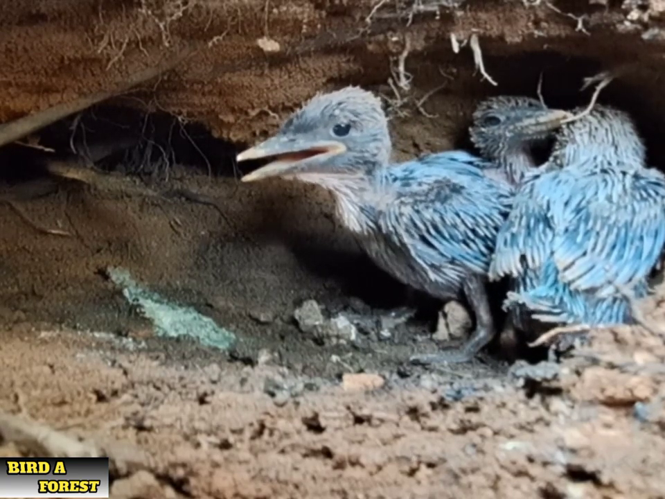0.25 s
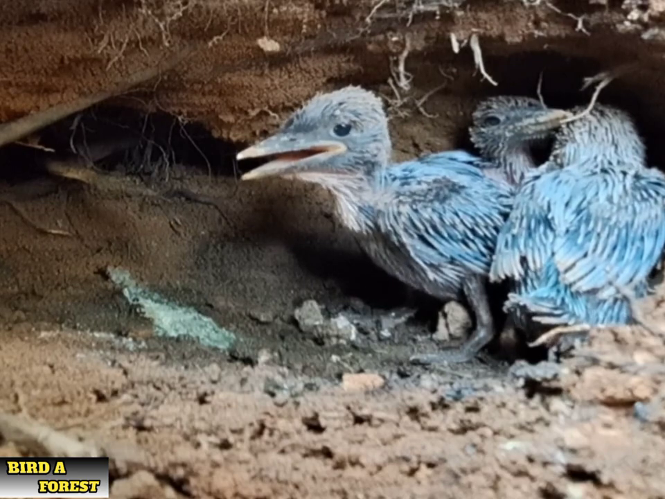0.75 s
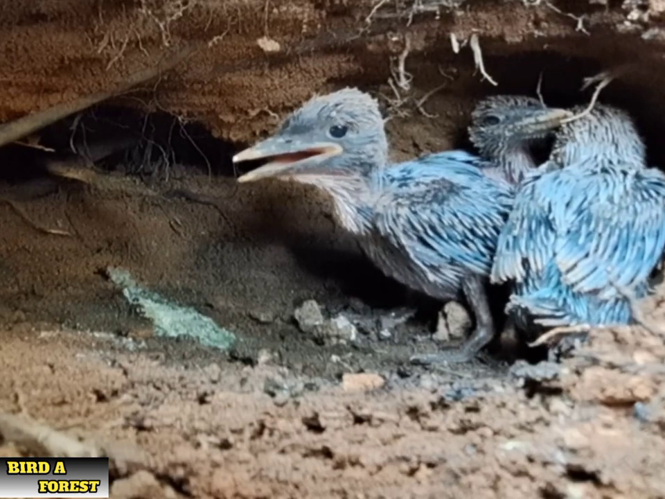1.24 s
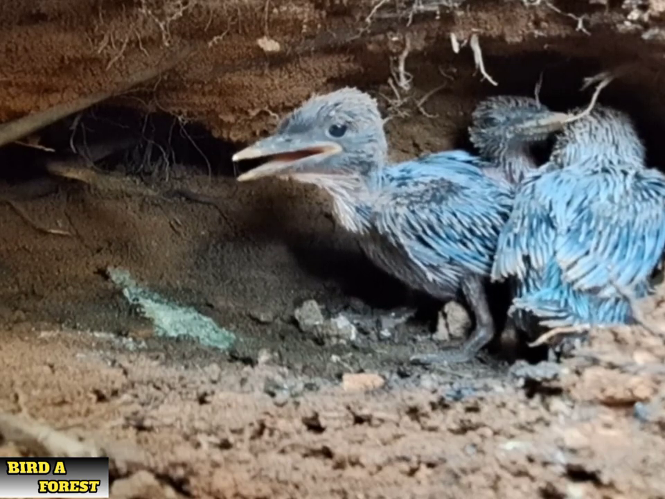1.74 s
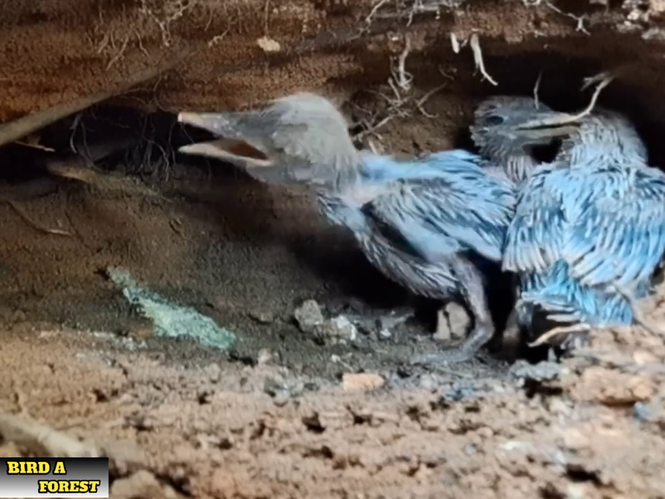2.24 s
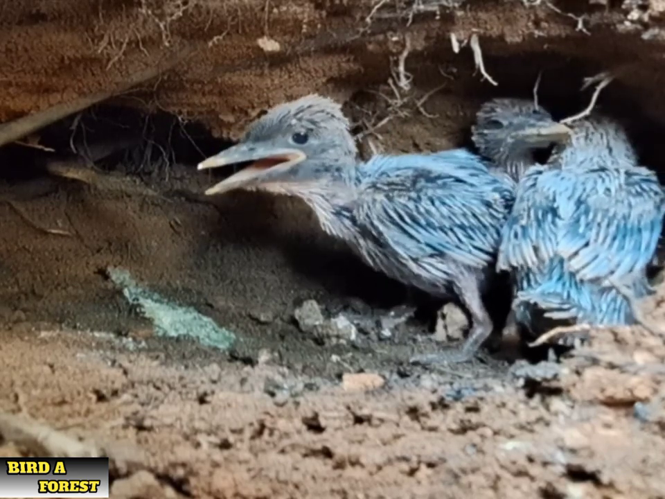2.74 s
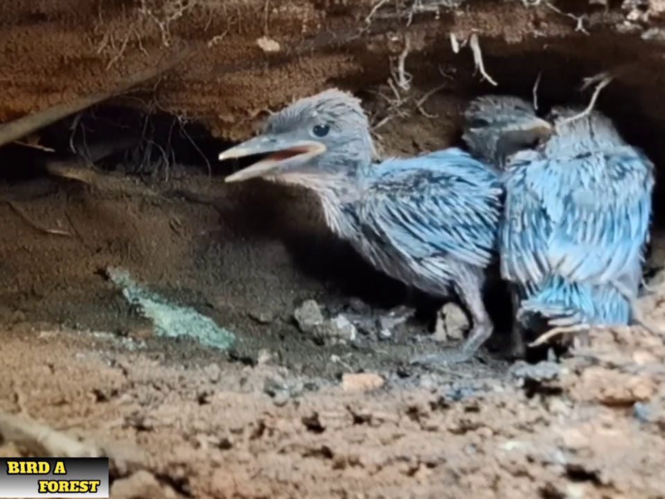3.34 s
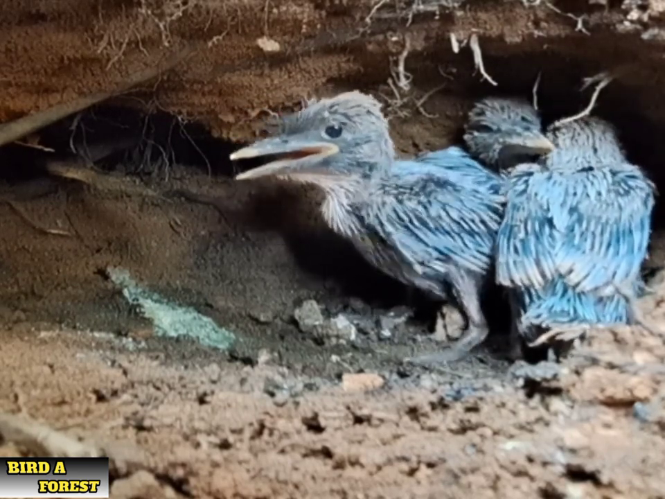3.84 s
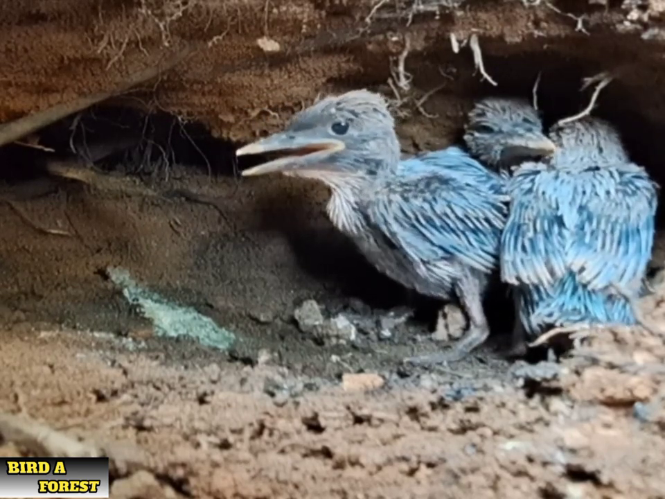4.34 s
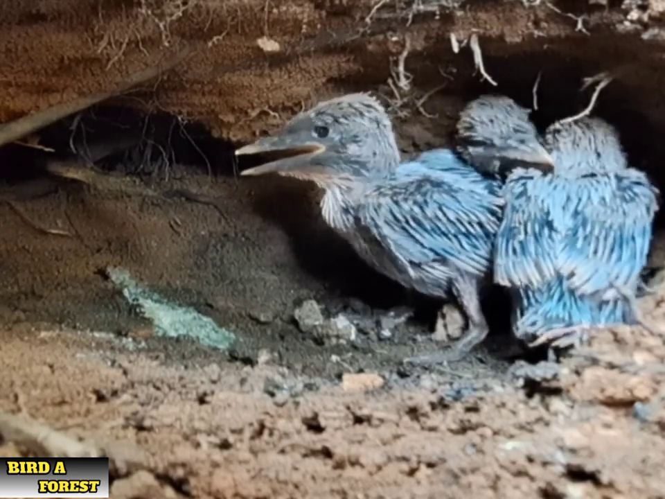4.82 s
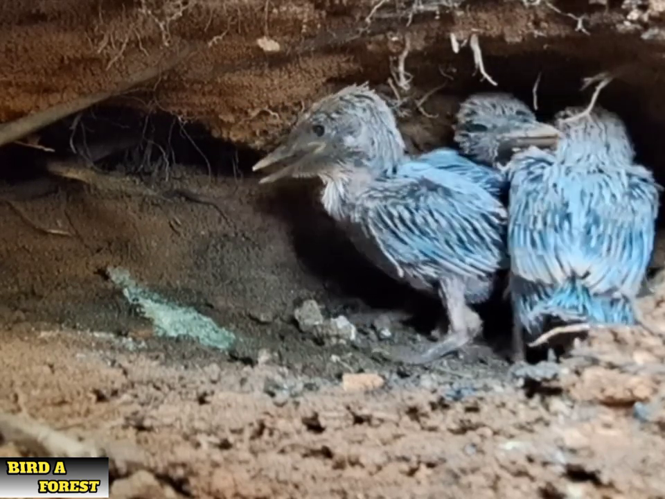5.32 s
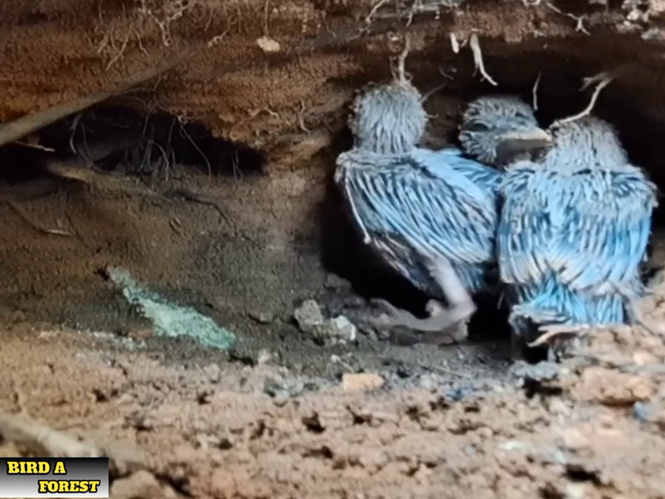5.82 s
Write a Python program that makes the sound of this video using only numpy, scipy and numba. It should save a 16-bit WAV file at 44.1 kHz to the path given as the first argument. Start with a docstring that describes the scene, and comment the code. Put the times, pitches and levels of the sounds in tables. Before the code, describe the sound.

In a small earthen burrow, a young bird begs very close to the left microphone, rattling out short, raspy churrs about nine per second. Many open with a tiny click or end in a squeak. After a hollow swallow come two long harsh cries, then more quick churrs, longer rasps, small swallows and a final loud churr. Low air stirs throughout; the right side is much fainter, slightly late and echoing.

```python
"""A nestling, rather like a young kingfisher, begs in an earthen burrow, close to the left of two microphone ports.
From the start it churrs in quick rows, its syrinx flapping chaotically into throat, windpipe, chest and beak;
many churrs open with a click or end on a clean squeak. Near 1.7 s a swallow rings a hollow, then two long cries
follow. More churrs, longer calls and two swallows come before a last loud churr at 6 s. Throughout, air stirs on
both ports, and the right port hears the bird late, with its tone changed and full of echoes from the earth walls."""
import sys
import numpy as np
from scipy import signal
from scipy.fft import rfft, irfft, next_fast_len
from scipy.io import wavfile
from scipy.ndimage import uniform_filter1d, minimum_filter1d, map_coordinates
from numba import njit

SR = 44100
rng = np.random.default_rng(int(sys.argv[2]) if len(sys.argv) > 2 else 0)


def ratio_of_db(decibels):
    """Turn decibels (scalar or array-like) into linear amplitude factors; 0 dB maps to 1."""
    return 10 ** (np.asarray(decibels, float) / 20)


def dump_mix(stems):
    """Bounce the given channels to the path in sys.argv[1] as a 16-bit WAV at rate SR."""
    frames = np.atleast_2d(stems).T  # one column per channel
    limited = np.clip(frames, -1, 1)  # hard clip at full scale
    pcm = np.round(limited * 32767).astype(np.int16)
    wavfile.write(sys.argv[1], SR, pcm)


N = 267687
T = np.arange(N) / SR  # time of every sample in seconds

# Air on the ports. Each row: time in seconds, level in dB before each port's own offset.
AIR_LEVEL = [(0, -45), (1.3, -41.5), (2.1, -48.5), (3, -52), (3.599, -47), (4.6, -48.5), (5.502, -46),
             (5.7, -40), (6.07, -48.5)]
# Tone of the stirring air. Each row: frequency in Hz, gain in dB; only the shape counts.
AIR_COLOUR = [(20, -14), (50, -0.5), (150, 1.5), (250, -8), (400, -19), (800, -19.5), (2000, -36)]
# Tone of the faint outdoor hiss. Each row: frequency in Hz, gain in dB; only the shape counts.
HISS_COLOUR = [(1500, 1), (3300, -1), (5400, 8.5), (7500, -28), (12000, -54), (15500, -48)]
# Earth walls toward the right port. Each row: frequency in Hz, gain in dB.
WALL_COLOUR = [(300, 13), (700, -7), (1300, 2), (2300, 7.5), (3000, -1), (3700, -2), (4500, 2.5),
               (6200, 8.5), (8500, 1), (15000, -3)]
# Swallows. Each row: time in seconds, frequency in Hz, width in Hz, level in dB.
GULPS = [(1.684, 820, 150, -19), (4.407, 800, 170, -25), (5.563, 900, 110, -28)]
# Churrs and long cries. Each row: start in seconds, length in seconds, full level in dB, opening click
# in dB (-40 or below means a soft opening).
CHURRS = [(-0.04, 0.068, -6.5, -60), (0.068, 0.05, -7, -16), (0.182, 0.052, -7.5, -19.5),
          (0.292, 0.059, -8, -18.5), (0.405, 0.06, -9, -19), (0.512, 0.066, -8.5, -13),
          (0.621, 0.057, -8.5, -22), (0.738, .05, -10, -60), (0.847, .068, -8, -60),
          (0.968, 0.062, -8, -60), (1.077, 0.062, -9, -20), (1.189, 0.058, -10.5, -21),
          (1.29, 0.055, -7, -15.5), (1.399, .054, -8, -60), (1.508, 0.067, -9.5, -18),
          (1.62, 0.078, -10, -19.5), (1.718, 0.38, -10, -24), (2.154, 0.35, -8.5, 2),
          (2.557, 0.053, -7, -60), (2.609, 0.13, -11.5, -60), (2.69, 0.077, -7, -60),
          (2.819, 0.053, -10, -17.5), (2.919, 0.05, -10.5, -14.5), (3.024, 0.055, -11, -18),
          (3.098, 0.077, -11.5, -60), (3.195, 0.052, -11, -60), (3.303, .055, -9.5, -16),
          (3.406, 0.053, -10.5, -15), (3.492, 0.048, -10.5, -60), (3.589, 0.059, -10, -18),
          (3.657, 0.12, -10.5, -60), (3.729, 0.077, -7.5, -60), (3.86, 0.056, -7.5, -16.5),
          (3.964, 0.055, -7, -16), (4.057, 0.061, -8.5, -17), (4.152, 0.048, -7, -13.5),
          (4.258, 0.059, -9, -16.5), (4.344, 0.057, -9.4, -29), (4.445, 0.05, -9.5, -17.5),
          (4.554, 0.052, -8.2, -15), (4.659, .057, -8.5, -13), (4.748, 0.052, -6, -22),
          (4.835, 0.043, -7.5, -20), (4.909, 0.11, -10, -18), (4.966, 0.18, -9, -60),
          (5.21, 0.065, -8, -17.5), (5.281, .07, -6, -22), (5.389, 0.057, -8, -19),
          (5.495, 0.061, -10.5, -20), (5.577, 0.087, -9.5, -21), (5.637, 0.116, -8.5, -60),
          (5.706, 0.23, -8, -58), (6.004, 0.064, -2, -60)]
# Squeaks, where the syrinx runs evenly as it closes. Each row: start in seconds, level in dB, middle pitch in Hz.
SQUEAKS = [(0.027, -12.5, 1490), (0.123, -12.5, 1516), (0.467, -28, 1504), (0.685, -25.5, 1490),
           (0.793, -10, 1400), (1.133, -9, 1667), (1.24, -12.5, 1780), (1.344, -15, 1328),
           (1.455, -10, 1478), (2.77, -31, 1390), (3.171, -12, 1563), (3.361, -19.5, 1350),
           (3.461, -16, 1460), (3.791, -17, 1742), (4.201, -12.5, 1723), (4.311, -14.5, 1790),
           (4.402, -11.5, 1787), (4.611, -15.5, 1520), (4.798, -11.5, 1840), (4.879, -10.5, 1782),
           (5.147, -10.5, 1650), (5.551, -8, 1650)]
# Head and throat posture. Each row: time in seconds, first and second throat resonance in Hz, second and
# third resonance against the first in dB, level of the beak band in dB, of the highest treble in dB,
# and of the right port in dB.
POSTURE = [(0, 2216, 2873, 9, 6, -23.5, -23.5, -22), (1.68, 2254, 2930, 6.5, 1.5, -28, -23.5, -22),
           (1.76, 2200, 2760, 1.5, -6, -29.5, -28, -21.5), (1.81, 2590, 3040, 8, -8, -13, -28, -20),
           (1.93, 2630, 3070, 1, -4, -8.5, -22, -21.5), (2.01, 2580, 3150, 2.5, -15, -11.5, -21, -20),
           (2.078, 2200, 2820, 0, -5, -17.5, -17.5, -21), (2.17, 2704, 3220, 1.5, -4.5, -11.5, -23, -28),
           (2.3, 2747, 3160, -4.5, -7.5, -6.5, -16.5, -24), (2.5, 2610, 3110, 4.5, -9.5, -13.5, -29, -22.5),
           (3.0, 2470, 2984, 1, -4, -17.5, -38, -21.5), (3.5, 2335, 2920, 4, -0.5, -21.5, -27, -23.5),
           (3.899, 2553, 3170, 1.5, 3.5, -22.5, -31, -24), (4.3, 2525, 3050, 0, 3.5, -30.5, -24.5, -25),
           (5.05, 2640, 3180, -4.5, 1.5, -37, -21, -24), (5.35, 2680, 3070, -6.5, 0.5, -37, -21, -27),
           (5.5, 2440, 3130, 4, 9.5, -41, -18, -18.5), (5.6, 2414, 3070, -8, -2.5, -43, -23, -18),
           (5.7, 2420, 2900, -1, -11, -32, -36, -19), (5.78, 2578, 2980, -4, -9, -34, -33, -20),
           (5.9, 2720, 3250, -5, 1.5, -29, -35, -22), (6.04, 2633, 3300, 1.5, -3.5, -41, -24.5, -26.5)]
# Fixed resonances of windpipe, chest and beak, and of the highest treble.
# Each row: frequency in Hz, width in Hz, level in dB within its group.
WINDPIPE = [(5200, 800, -11), (4400, 750, -1)]
CHEST = [(2130, 204, 0), (1620, 240, -10), (1350, 230, -6.5), (955, 242, -7), (745, 229, -2),
         (512.7, 296, -6)]
BEAK = [(6360, 180, -12.5), (7050, 2050, -3), (8710, 2030, -7), (10070, 1400, -18)]
TOP_TREBLE = [(12000, 5600, 1), (14940, 530, -10)]

SOFT_CLICK_DB = -40  # a click must be louder than this to change how the churr opens
CLICK_LEAD_S = 0.0054  # from click to voice
CLICK_SWELL_S, SOFT_SWELL_S = 0.0066, 0.018  # swell after a click and without one
CLICK_ONSET_DB, SOFT_ONSET_DB = -17.5, -11  # where the swell begins, against the full level
HOLD_S, FADE_DB = 0.017, -9.5  # a churr holds briefly, then fades until it shuts
CRY_S, CRY_FADE_S, CRY_FADE_DB = 0.12, 0.018, -3  # a call longer than CRY_S holds almost to its end
SQUEAK_S = 0.011
LOOSE_WIDTH_HZ, TAUT_WIDTH_HZ, TAUTEN_S = 230, 140, 0.12  # throat width, and averaging time of the effort
TREMBLE = 0.012  # share by which the throat resonances wander
THIRD_HZ, WINDPIPE_DB = 3535, -16.5
CHEST_DB, CHEST_LOSS_DB, SHUT_HZ, OPEN_HZ = -15.5, -12.5, 2200, 2720  # the chest fades as the throat opens
FACING_DB, SHADOW = -20.5, 0.69  # past this right port level the turning bird's chest is shadowed (dB per dB)


def unit(x):
    """Scale a sound to rms 1."""
    return x / np.sqrt(np.mean(x ** 2))


def colour(x, points):
    """Filter a sound by (Hz, dB) points joined on a log-frequency axis."""
    size = next_fast_len(N)
    hz, db = np.transpose(points)
    bin_hz = np.arange(1, size // 2 + 2) * SR / size
    gain = ratio_of_db(np.interp(np.log(bin_hz), np.log(hz), db))
    return irfft(rfft(x, size) * gain, size)[:N]


def walk(rate):
    """Random levels held 1 / rate seconds, then smoothed twice over that time; rms 1."""
    hold = int(SR / rate)
    steps = np.repeat(rng.standard_normal(N // hold + 1), hold)
    return unit(uniform_filter1d(uniform_filter1d(steps, hold), hold)[:N])


@njit
def moving_bandpass(x, hz, width):
    """A band-pass with a moving centre and gain 1 there, kept as two running states."""
    out, band, low = np.empty(len(x)), 0., 0.
    for i in range(len(x)):
        g = np.tan(np.pi * hz[i] / SR)
        damping = width[i] / hz[i]
        v = (band + g * (x[i] - low)) / (1 + g * (g + damping))
        band = 2 * v - band
        low = low + 2 * g * v
        out[i] = damping * v
    return out


def ring(x, hz, width, db, skirt=1):
    """A resonance, then one skirt times as wide; dB is near the output power for white input of rms 1."""
    hz, width = hz + np.zeros(N), width + np.zeros(N)
    gain = ratio_of_db(db) * np.sqrt((1 + 1 / skirt) * SR / (np.pi * width))
    first = moving_bandpass(x + 1e-18, hz, width)
    return gain * moving_bandpass(first, hz, width * skirt)


def air():
    """Low stirring of air, unrelated on the two ports, over a faint outdoor hiss; both are filtered noise."""
    s, db = np.transpose(AIR_LEVEL)
    stir = [unit(colour(rng.standard_normal(N), AIR_COLOUR)) * ratio_of_db(3.2 * walk(6)) for _ in range(2)]
    hiss = [unit(colour(rng.standard_normal(N), HISS_COLOUR)) for _ in range(2)]
    stir_db = np.interp(T, s, db) + np.array([[5], [-1.5]])  # left port, right port
    hiss_db = np.array([[-56], [-61]])
    return ratio_of_db(stir_db) * stir + ratio_of_db(hiss_db) * hiss


def burrow(x, t60_s, level_db):
    """Soft earth gives dense, short echoes: noise that dies away by 60 dB in t60_s."""
    t = np.arange(int(0.15 * SR)) / SR
    echoes = rng.standard_normal(len(t)) * ratio_of_db(-60 * t / t60_s) * (t > 0.001)
    echoes = echoes / np.sqrt(np.sum(echoes ** 2))
    return ratio_of_db(level_db) * signal.fftconvolve(x, echoes)[:N]


def gulp(s, hz, width, db):
    """In a swallow, one push rings a hollow."""
    push = np.zeros(N)
    push[int(s * SR)] = np.sqrt(SR / width)
    return ring(push, hz, width, db)


def posture():
    """The head and throat glide between postures: each column at every sample."""
    s, *columns = np.transpose(POSTURE)
    return [np.interp(T, s, column) for column in columns]


@njit
def flap(hz, stretch, size):
    """One pulse per membrane cycle, shared between two samples; each cycle has its own length and size."""
    pulses, phase, cycle = np.zeros(len(hz) + 1), 0., 0
    for i in range(len(hz)):
        step = hz[i] * stretch[cycle] / SR
        phase += step
        if phase >= 1:
            phase, cycle = phase - 1, cycle + 1
            pulses[i] += size[cycle] * phase / step
            pulses[i + 1] += size[cycle] * (1 - phase / step)
    return pulses[:-1]


def chaotic_membrane(hz=1500, jitter=0.4, scatter_db=4.0, breath=1.18, flutter_db=1.24):
    """Cycles of very uneven length and size with turbulent air; the whole flutters a few hundred times a second."""
    length_chance, size_chance = rng.standard_normal((N // 4, 2)).T
    stretch = np.exp(np.clip(jitter * length_chance, -1, 1))
    pulses = flap(np.full(N, 1. * hz), stretch, ratio_of_db(scatter_db * size_chance))
    flow = unit(pulses - pulses.mean()) + breath * rng.standard_normal(N)
    return unit(flow * ratio_of_db(flutter_db * walk(400)))


def churr_effort(edge_s=0.0024):
    """The push behind each churr swells, holds, fades and shuts."""
    effort = np.zeros(N)
    for s, length, db, click_db in CHURRS:
        start, swell, onset_db = s, SOFT_SWELL_S, SOFT_ONSET_DB
        if click_db > SOFT_CLICK_DB:
            start, swell, onset_db = s + CLICK_LEAD_S, CLICK_SWELL_S, CLICK_ONSET_DB
        full, end = start + swell, s + length
        fade, fade_db = full + HOLD_S, FADE_DB
        if length > CRY_S:
            fade, fade_db = end - CRY_FADE_S, CRY_FADE_DB
        i = slice(max(int(start * SR), 0), int(end * SR))
        times = [start, full, fade, max(end, fade)]
        shape = ratio_of_db(np.interp(T[i], times, [db + onset_db, db, db, db + fade_db]))
        effort[i] = np.maximum(effort[i], shape)  # where calls overlap, the stronger push wins
    return uniform_filter1d(effort, int(edge_s * SR))


def clicks(membrane, rise_s=0.0015):
    """A few milliseconds of flapping at the start of each call after the first."""
    effort = np.zeros(N)
    t = np.arange(int(8 * rise_s * SR)) / SR / rise_s
    for s, _, _, db in CHURRS[1:]:
        i = int(s * SR)
        effort[i:i + len(t)] += ratio_of_db(db) * t ** 2 * np.exp(2 - 2 * t)
    return membrane * effort


def squeaks(membrane, fall=0.18, jitter=0.018, even=0.41, rough=0.48):
    """Cycles turn nearly even, and their pitch sags as the pressure drops; some rough flapping stays."""
    hz, effort = np.full(N, 1500.), np.zeros(N)
    n = int(SQUEAK_S * SR)
    for s, db, pitch in SQUEAKS:
        i = int(s * SR)
        hz[i:i + n] = pitch * (1 + fall * np.linspace(0.5, -0.5, n))
        effort[i:i + n] = ratio_of_db(db) * np.hanning(n) ** 0.64
    pulses = flap(hz, 1 + jitter * rng.standard_normal(N // 4), np.ones(N // 4))
    return (even * unit(pulses - pulses.mean()) + rough * membrane) * effort


def throat(flow, slack, low_hz, mid_hz, mid_db, high_db):
    """Three throat resonances wander and flicker as the throat trembles, and narrow under sustained effort."""
    taut = np.clip(uniform_filter1d(1 - slack, int(TAUTEN_S * SR)) / 0.88, 0, 1) ** 2
    width = LOOSE_WIDTH_HZ + (TAUT_WIDTH_HZ - LOOSE_WIDTH_HZ) * taut
    total = np.sqrt(1 + ratio_of_db(2 * mid_db) + ratio_of_db(2 * high_db))  # keeps their joint power steady
    bands = []
    for hz, db in ((low_hz, 0), (mid_hz, mid_db), (THIRD_HZ, high_db)):
        moving_hz = hz * (1 - 0.01 * slack + TREMBLE * walk(40))
        bands.append(ring(flow, moving_hz, width, db, skirt=4.9) * ratio_of_db(1.97 * walk(35)) / total)
    return bands


def fixed_resonances(drive, modes, db):
    """Resonances at fixed pitches with alternating signs; each swells and dips as the head moves."""
    total = np.zeros(N)
    for k, mode in enumerate(modes):
        total += (-1) ** k * ratio_of_db(2.6 * walk(20)) * ring(drive, *mode)
    return ratio_of_db(db) * total


def nestling():
    """The syrinx drives throat, windpipe, chest, beak and top treble; the middle throat resonance comes apart."""
    low_hz, mid_hz, mid_db, high_db, beak_db, treble_db, port_db = posture()
    opening = np.clip((low_hz - SHUT_HZ) / (OPEN_HZ - SHUT_HZ), 0, 1)
    chest_db = CHEST_DB + CHEST_LOSS_DB * opening ** 3
    chest_db = chest_db - SHADOW * np.maximum(port_db - FACING_DB, 0)
    membrane, effort = chaotic_membrane(), churr_effort()
    # with less pressure the membrane sputters and the throat slackens
    slack = np.clip(1 - effort / ratio_of_db(-8.5), 0, 1)
    sputter = ratio_of_db(4.15 * slack * (walk(250) - 1.0))
    click = clicks(membrane)
    flow = membrane * effort * sputter + click + squeaks(membrane)
    low, mid, high = throat(flow, slack, low_hz, mid_hz, mid_db, high_db)
    bright = flow * ratio_of_db(2.25 - 5.5 * slack) + click  # the treble needs full pressure
    rest = low + high + sum(gulp(*row) for row in GULPS)
    rest = rest + fixed_resonances(bright, WINDPIPE, WINDPIPE_DB)
    rest = rest + fixed_resonances(flow + 2.3 * click, CHEST, chest_db)  # each click's puff thumps the chest
    rest = rest + fixed_resonances(bright, BEAK, beak_db)
    rest = rest + fixed_resonances(bright, TOP_TREBLE, treble_db)
    return rest, -mid


def scene():
    """Left port near the bird; right port slightly later, side-on to the beak and full of echoes."""
    rest, mid = nestling()
    near = rest + mid
    left = near + burrow(near, 0.046, -24)
    aside = rest + ratio_of_db(-15) * mid  # little of the middle throat resonance goes sideways
    lag = 4 + 1.8 * walk(8)  # in samples; the head bobs
    late = map_coordinates(aside, [np.arange(N) - lag], order=3)
    right = colour(late + burrow(aside, 0.072, 0), WALL_COLOUR) * ratio_of_db(posture()[-1])
    return np.array([left, right]) + air()


def top_cut(x):
    """Nothing passes above the cut-off."""
    return signal.sosfilt(signal.butter(12, 15810, fs=SR, output="sos"), x)


def record(dry):
    """A quick limiter holds the loudest peaks near full scale; a steep low-pass cuts the top."""
    top, hold_s, cut_hz = 0.97, 0.002, 15800
    size = int(hold_s * SR)
    peak = -minimum_filter1d(-np.abs(dry), 2 * size)
    peak = uniform_filter1d(peak, size)
    held = dry * np.minimum(1, top / (peak + 1e-9))
    low_pass = signal.ellip(8, 0.2, 70, cut_hz, fs=SR, output="sos")
    mix = signal.sosfilt(low_pass, held)
    return top_cut(mix)


dry = scene()
out = record(dry)
dump_mix(out)
```